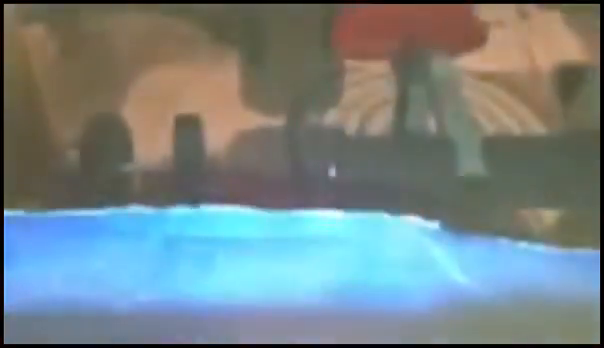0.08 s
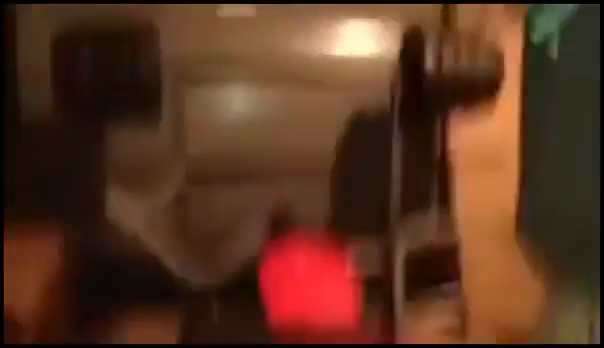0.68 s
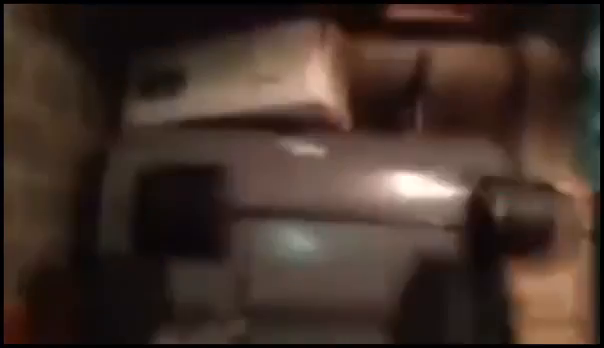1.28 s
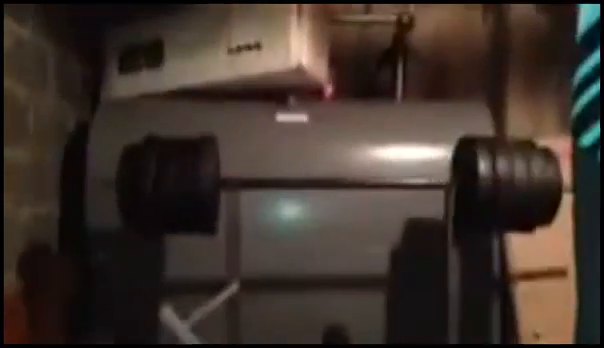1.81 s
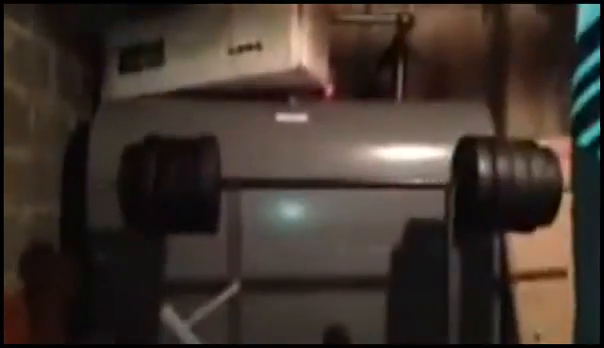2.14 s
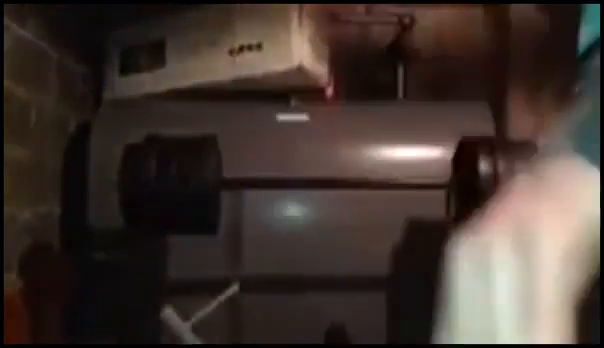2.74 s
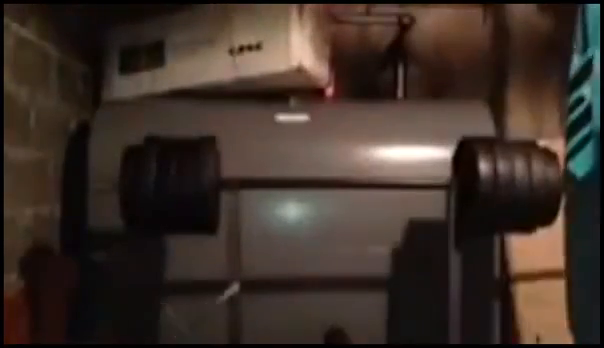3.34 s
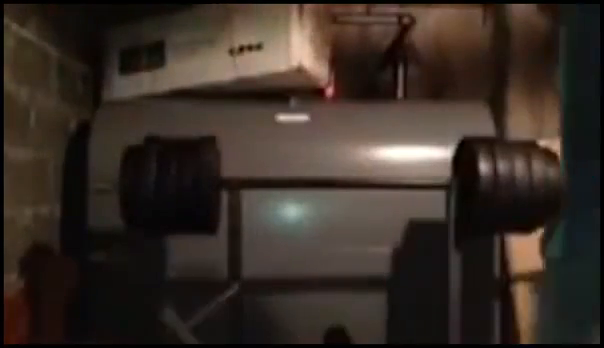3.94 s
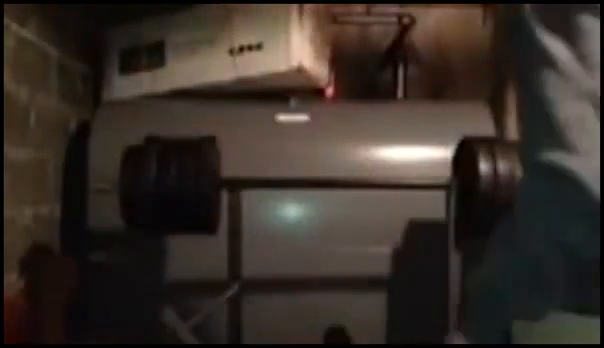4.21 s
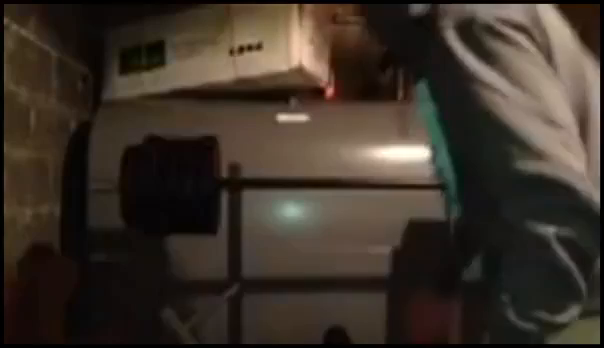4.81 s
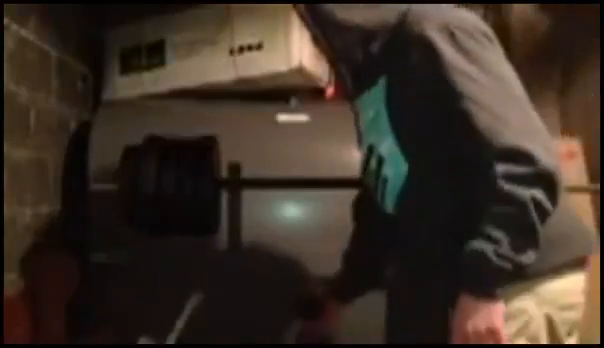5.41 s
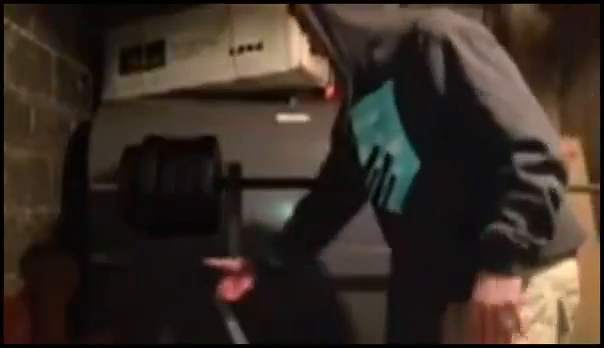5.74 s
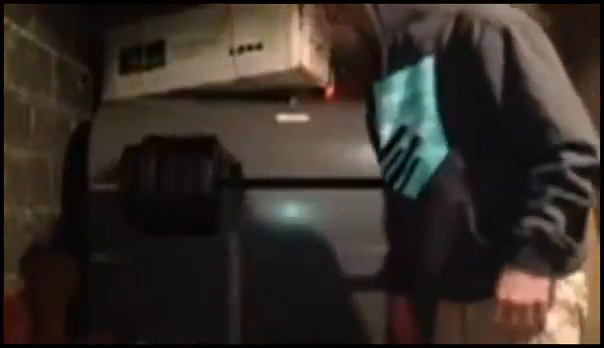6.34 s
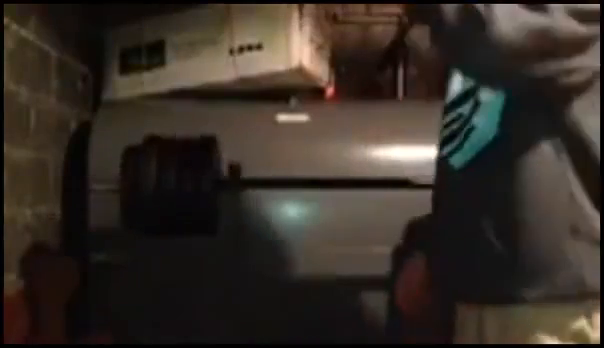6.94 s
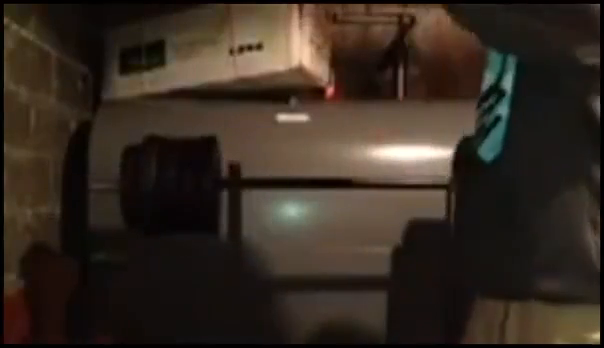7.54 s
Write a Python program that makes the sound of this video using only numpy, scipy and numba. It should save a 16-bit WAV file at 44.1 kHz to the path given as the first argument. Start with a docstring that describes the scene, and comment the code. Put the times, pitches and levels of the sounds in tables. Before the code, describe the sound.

Fingers rub and bump on the microphone, then clothes rustle and a steel weight bench is knocked, ending in two loud, ringing clanks.

```python
"""A small garage gym, heard from a phone's own microphone. For three seconds the phone is carried and
set down: fingers rub, bump and tick on its case, right at the microphone, over dull footfalls.
Then, out in the room, someone walks up to the weight bench with rustling clothes and from 5.5 s
knocks its steel frame a few times. Near 6.5 and 6.8 s a steel part slams home and rings on;
the phone's limiter flattens the two clanks."""
import sys
import numpy as np
from scipy import signal
from scipy.fft import rfft, irfft, next_fast_len
from scipy.io import wavfile
from scipy.ndimage import uniform_filter1d
from numba import njit

SR = 44100
rng = np.random.default_rng(int(sys.argv[2]) if len(sys.argv) > 2 else 0)


def wav_record(signal):
    """Record a signal, one row per channel, as 16-bit PCM in the file named by sys.argv[1]."""
    frames = np.transpose(np.atleast_2d(signal))
    bounded = np.clip(frames, -1, 1)
    # unit amplitude maps onto the largest positive 16-bit level
    quanta = np.round(bounded * 32767).astype(np.int16)
    wavfile.write(sys.argv[1], SR, quanta)


N = 338247
TIME = np.arange(N) / SR
BAND_HZ = 5900  # upper edge of the phone's band


def undb(db):
    """Decibels to gain."""
    return 10 ** (np.asarray(db) / 20)


def unit(x):
    """Scale to an rms of one."""
    return x / np.sqrt(np.mean(x ** 2))


def fade(t60, size=SR):
    """An exponential decay that loses 60 dB in t60 seconds."""
    return np.exp(-np.log(1000) * TIME[:size] / t60)


def colour(x, points, tilt_db=0, size=4096):
    """Causal filter of unit power with a (Hz, dB) shape, tilted by tilt_db per octave above 600 Hz."""
    hz, db = np.transpose(points)
    octave = np.log2(np.maximum(np.arange(size // 2 + 1) * SR / size, 1))
    shape = np.interp(octave, np.log2(hz), db) + tilt_db * np.maximum(octave - np.log2(600), 0)
    shape -= 60 * np.maximum(octave - np.log2(BAND_HZ), 0)
    cepstrum = irfft(np.log(undb(shape)))
    cepstrum[size // 2:] = 0  # minimum phase keeps attacks sharp
    cepstrum[0] = 0
    response = irfft(np.exp(2 * rfft(cepstrum)))
    return signal.fftconvolve(x, response / np.linalg.norm(response))[:len(x)]


def wander(rate):
    """Smooth random drift with an rms of one, turning about `rate` times a second."""
    hold = int(SR / rate)
    stairs = np.repeat(rng.standard_normal(N // hold + 1), hold)
    return unit(uniform_filter1d(stairs, hold)[:N])


def grains(rate, spread_db):
    """Tiny slips at random moments, a few much stronger than the rest."""
    strength = undb(spread_db * np.minimum(rng.exponential(size=N), 5))
    return unit((rng.random(N) < rate / SR) * strength * rng.standard_normal(N))


def waver(x, depth_db, rate):
    """Let each octave swell and sink on its own, so that the colour keeps shifting."""
    size = next_fast_len(N, real=True)
    spectrum = rfft(x, size)
    hz = np.arange(len(spectrum)) * SR / size
    octave = np.log2(np.clip(hz / 375, 1, 16))
    bands = (irfft(spectrum * np.maximum(1 - np.abs(octave - k), 0), size)[:N] for k in range(5))
    return sum(band * undb(depth_db * wander(rate)) for band in bands)


def add(track, start, sound):
    """Mix a sound into a track, `start` seconds in."""
    i = max(int(start * SR), 0)
    track[i:i + len(sound)] += sound[:N - i]


# how hard the fingers slide on the case until they let go (time [s], level [dB])
FINGER_SLIDE = [(0, -29), (.06, -34), (.18, -36), (.28, -57.5), (.495, -78), (.525, -55), (.67, -30),
                (.745, -41.5), (.80, -27), (.95, -42), (1.06, -32), (1.11, -42.5), (1.41, -57.5),
                (1.51, -37.5), (1.58, -46), (1.67, -37.5), (1.82, -49), (2.26, -59.5), (2.38, -52.5),
                (2.66, -59.5), (2.85, -83.5)]
# spectrum of skin sliding on the case (frequency [Hz], level [dB])
SKIN_SPECTRUM = [(60, -20.5), (150, 3), (400, -2.5), (800, 1.5), (1300, -2.5), (3500, -1.5), (5600, -8.5)]
# spectrum of the plastic's crackles and ticks (frequency [Hz], level [dB])
PLASTIC_SPECTRUM = [(120, -13.5), (750, -2), (1200, -0.5), (1700, 3.5), (2500, -4.5), (3500, 0), (4300, 2),
                    (5200, 1.5), (6500, -10)]
SNAP_TILT_DB = 1.3  # per octave: snaps and crackles are brighter than a plain tick
def rubbing(slide_db=-1, crackle_db=-13, light_touch_db=-59.5, firm_touch_db=-29):
    """At the microphone, skin slides in jerks and catches with a crackle; a light touch is brighter."""
    db = np.interp(TIME, *np.transpose(FINGER_SLIDE), right=-np.inf)
    jerks = grains(rate=6000, spread_db=1.31) * undb(1.7 * wander(90))
    skin = undb(db + slide_db) * waver(jerks, depth_db=2.0, rate=14)
    crackle = undb(db + crackle_db) * grains(rate=150, spread_db=2.5)
    firmness = np.clip((db - light_touch_db) / (firm_touch_db - light_touch_db), 0, 1)
    dull = colour(firmness * skin, SKIN_SPECTRUM, tilt_db=-1.16)
    bright = colour((1 - firmness) * skin, SKIN_SPECTRUM, tilt_db=0.5)
    return dull + bright + colour(crackle, PLASTIC_SPECTRUM, SNAP_TILT_DB)


# fingers knocking on the case (time [s], level [dB], pitch [Hz])
FINGER_KNOCKS = [(0.01, -11, 172), (0.029, -9, 290), (0.042, -6.5, 217), (0.115, -11, 194),
                 (0.632, -18, 228), (0.8, -10.5, 171), (0.835, -5, 172), (1.559, -27.5, 200),
                 (1.606, -4.5, 155), (1.635, -4.5, 240), (1.647, -5.5, 584), (1.666, -15, 256),
                 (1.7516, -14, 221), (1.954, -38, 299), (2.333, -41, 180), (2.69, -46, 150)]
# spectrum of the shuddering case (frequency [Hz], level [dB])
CASE_SPECTRUM = [(50, -27), (100, -15.5), (140, 3), (220, -2.5), (380, 1), (650, -2), (1300, -17)]
def bumps(push_cycles=0.46, shudder_db=-13, shudder_t60=0.1):
    """A finger shoves the case around the microphone: a cycle or two of low swing, then a shudder."""
    out = np.zeros(N)
    for start, db, hz in FINGER_KNOCKS:
        age = hz * TIME[:SR] / push_cycles
        swing = np.sin(2 * np.pi * hz * TIME[:SR]) * age ** 2 * np.exp(-age * np.sqrt(2))
        shudder = colour(rng.standard_normal(SR) * fade(shudder_t60), CASE_SPECTRUM)
        add(out, start, undb(db) * (swing / np.abs(swing).max() + undb(shudder_db) * shudder))
    return out


def case_snaps(firm_db=-22, snap_lag_s=.005, snap_db=-3.5, settle_gap_s=.009, settle_db=-6):
    """Rows of ticks: just after a firm knock the case snaps, then settles in two weaker ticks."""
    rows = []
    for start, db, _ in FINGER_KNOCKS:
        gaps = rng.uniform(.3, 1.7, 2)
        if db > firm_db:
            lags = snap_lag_s + settle_gap_s * np.append(0, np.cumsum(gaps))
            for k, lag in enumerate(lags):
                rows.append((start + lag, db + snap_db + k * settle_db, SNAP_TILT_DB))
    return rows


# lone ticks of the case under the fingers (time [s], level [dB], tilt [dB/octave])
CASE_TICKS = [(.018, -24, -2.5), (.062, -18, 5), (.136, -19.5, 2.5), (.144, -8.5, -2), (.174, -15, 1),
              (.192, -21.5, 0.5), (.2145, -21, -1), (.859, -15.5, 8.5), (.895, -27, 11.5), (1.011, -22, 0),
              (1.055, -20.5, 0), (1.168, -22.5, 0.5), (1.466, -33, -6), (1.672, -12.5, 5.5),
              (1.677, -9.5, 5.5), (1.765, -15, 2), (1.8846, -27.5, -3), (1.988, -34.5, 0.5),
              (2.148, -31.5, -3.5), (2.289, -37.5, -4.5), (2.371, -23.5, 0.5), (2.554, -34.5, 1.5),
              (2.6125, -33.5, -4.5), (2.689, -39.5, 2.5), (2.816, -34, -2), (2.828, -31.5, -0.5),
              (2.871, -41.5, 2), (2.949, -41, -0.5), (4.24, -50, 4.5)]
def ticks(snap_t60=0.011, rattle_db=-24, rattle_t60=.04, gain_db=-1, size=4096):
    """Right at the microphone the plastic snaps and rattles, duller or brighter with each touch."""
    out = np.zeros(N)
    decay = fade(snap_t60, size) + undb(rattle_db) * fade(rattle_t60, size)
    for start, db, tilt_db in [*CASE_TICKS, *case_snaps()]:
        tick = colour(rng.standard_normal(size) * decay, PLASTIC_SPECTRUM, tilt_db)
        add(out, start, undb(db + gain_db) * tick / np.abs(tick).max())
    return out


# dull footfalls (time [s], level [dB], tilt [dB/octave])
FOOTFALLS = [(.145, -22.5, 0.5), (.185, -25.5, 1.5), (.394, -34, -2), (.660, -31.5, -0.5), (1.649, -24, 0),
             (2.62, -49.5, -4.5), (5.484, -40.5, 1.5), (5.528, -41.5, -2.5), (5.818, -46, 4.5)]
# spectrum of the floor underfoot (frequency [Hz], level [dB])
FLOOR_SPECTRUM = [(60, -31.5), (140, -6.5), (215, 7.5), (330, -2.5), (600, -0.5), (1100, -3), (1700, -17),
                  (5000, -34)]
def steps(t60=0.2875):
    """Farther from the microphone, footfalls boom briefly in the garage floor."""
    out = np.zeros(N)
    for start, db, tilt_db in FOOTFALLS:
        thud = rng.standard_normal(SR) * fade(t60)
        add(out, start, undb(db) * colour(thud, FLOOR_SPECTRUM, tilt_db))
    return out


# clothes brushing at each stride or reach (time [s], length [s], level [dB], tilt [dB/octave])
CLOTH_SWISHES = [(3.228, 0.161, -62, 8), (3.884, .12, -52.5, 4), (4.181, 0.183, -62.5, 4),
                 (4.338, 0.1774, -48.5, 1), (4.498, 0.234, -55, 3.5), (4.81, 0.186, -61, 3),
                 (4.915, 0.163, -54.5, -2.5), (5.155, 0.1903, -50.5, -1.5), (5.405, 0.328, -49.5, -3.5),
                 (6.133, 0.322, -49, -2.5), (7.299, .16, -66, -2.5)]
# spectrum of the fabric (frequency [Hz], level [dB])
CLOTH_SPECTRUM = [(70, -28), (300, -10.5), (900, 3.5), (1500, 1.5), (2600, 2.5), (4200, 0), (5800, -12)]
def clothes(attack_s=0.1483, release_s=.085):
    """Faint, out in the room: countless fibres brush past each other as the folds shift."""
    out, t = np.zeros(N), TIME[:SR]
    fibres = waver(grains(rate=14000, spread_db=0.07), depth_db=1.5, rate=28)
    for start, length, db, tilt_db in CLOTH_SWISHES:
        swell = np.minimum(t / attack_s, 1) ** 2 * np.exp(-np.maximum(t - length, 0) / release_s)
        brush = swell * np.roll(fibres, -int(start * SR))[:SR]
        add(out, start, undb(db) * colour(brush, CLOTH_SPECTRUM, tilt_db))
    return out


# blows on the bench's steel (time [s], level [dB], place struck [0-2], ring against crash [dB],
# rise [s], crash tilt [dB/octave], crash t60 [s])
BENCH_BLOWS = [(5.482, -35.5, 0, -11.5, 0.00182, -3.5, 0.174), (5.674, -33.5, 0, -4, 0.00337, -3, 0.213),
               (5.844, -35, 0, -5, 0.0018, -0.5, 0.191), (5.957, -26, 0, 6, 0.00657, -1.5, 0.24),
               (6.034, -24.5, 1, -14, 0.00423, -2, 0.197), (6.549, -4, 1, -2.5, 0.00202, 1.06, 0.307),
               (6.581, -5, 1, 0.5, .001, 0.88, 0.2), (6.599, -6, 1, 0.5, 0.00134, 0.37, 0.244),
               (6.794, -3, 2, 0.5, 0.00275, 1.21, 0.3303), (6.880, -9, 2, -1, 0.0062, -1, 0.178)]
# the steel's modes (frequency [Hz], t60 [s], level struck at place 0 [dB], at 1 [dB], at 2 [dB])
STEEL_MODES = [(558.3, 0.28, -14.5, -14, -13.5), (1114, 0.26, -14.5, -20.5, -30.5),
               (1229.6, .22, -9.5, -24.5, -28.5), (1736.8, 0.31, -5.5, -17, -14),
               (1920, .24, -10.5, -18.5, -16.5), (2130, 2.6, -38, -25.5, -43), (2152, 2.4, -26.5, -34, -38),
               (2218, 1.1, -45, -29.5, -34.5), (2231, 1.1, -38, -15.5, -30.5),
               (2283, 0.71, -21.5, -27, -32), (2365, 0.94, -17.5, -20, -38.5),
               (2508, 0.28, -16.5, -21.5, -25), (2677, 0.46, -22.5, -16.5, -31.5),
               (2776, .2, -11.5, -11.5, -12.5), (3031, 0.46, -18.5, -16, -30), (3285, 0.12, -8, -18, -13),
               (3370, .2, -20, -16.5, -17), (3620, 0.362, -14.5, -23, -9), (3764, 0.18, -10, -23, -18.5),
               (3940, .22, -14.5, -17, -15.5), (4908, 0.21, -21.5, -13.5, -11.5),
               (5498, .16, -25.5, -13, -19.5)]
# spectrum of the steel's crash (frequency [Hz], level [dB])
CRASH_SPECTRUM = [(50, -19.5), (130, -12.5), (280, -7), (480, 1.5), (780, -2), (1050, 2), (1350, -1.5),
                  (1800, 2), (2800, 2.5), (4000, 1), (4700, -2.5), (6000, -8)]
def bench(chatter_db=1.53, choke_t60=0.076, size=2 * SR):
    """Out in the room, struck steel gives a chattering crash and rings until the next blow chokes it."""
    out, t = np.zeros(N), TIME[:size]
    hz, ring_t60, *place_db = np.transpose(STEEL_MODES)
    # the long modes near 2.15 kHz beat against each other as they ring on
    modes = np.sin(2 * np.pi * hz[:, None] * t) * fade(ring_t60[:, None], size)
    gaps = np.diff([blow[0] for blow in BENCH_BLOWS], append=TIME[-1])
    for (start, db, place, ring_db, rise_s, tilt_db, crash_t60), gap in zip(BENCH_BLOWS, gaps):
        chatter = rng.standard_normal(size) * undb(chatter_db * wander(170)[:size])
        crash = colour(chatter * fade(crash_t60, size), CRASH_SPECTRUM, tilt_db)
        choke = np.exp(-np.log(1000) * np.maximum(t - gap, 0) / choke_t60)
        ring = choke * (undb(ring_db + place_db[place]) @ modes)
        onset = 1 - np.exp(-t / rise_s)  # a glancing blow scrapes in over a few milliseconds
        add(out, start, undb(db) * (crash + ring) * onset)
    return out


# spectrum of the garage's reverberation (frequency [Hz], level [dB])
GARAGE_SPECTRUM = [(70, -21), (140, 3), (220, 4.5), (400, -1.5), (1500, -3.5), (6000, -6)]
def garage(x, t60=.27, first_echo_s=0.0028):
    """Diffuse reverberation reaches the microphone from close block walls."""
    tail = rng.standard_normal(SR) * fade(t60) * (TIME[:SR] > first_echo_s)
    return colour(signal.fftconvolve(x, tail / np.linalg.norm(tail))[:N], GARAGE_SPECTRUM)


# spectrum of the noise floor (frequency [Hz], level [dB])
HISS_SPECTRUM = [(60, -16), (140, -1.5), (400, -3.5), (1500, -9), (5800, -13.5)]
def hiss(level_db=-67):
    """A faint, steady hiss lies under everything."""
    return undb(level_db) * colour(rng.standard_normal(N), HISS_SPECTRUM)


def scene():
    """One channel: handling is right at the microphone; the bench and the person stand in the room."""
    handling = bumps() + ticks() + rubbing()
    gym = bench() + steps() + clothes()
    to_walls = undb(-17.5) * handling + undb(-17.0) * gym
    return (handling + gym + hiss() + garage(to_walls))[None]


@njit
def follow(x, attack_s, release_s):
    """The limiter's envelope rises fast and falls slowly."""
    attack, release = 1 - np.exp(-1 / (attack_s * SR)), 1 - np.exp(-1 / (release_s * SR))
    out, level = np.empty(len(x)), 0.
    for i in range(len(x)):
        level += (x[i] - level) * (attack if x[i] > level else release)
        out[i] = level
    return out


def record(dry, low_hz=98, ceiling_db=-1.84, top_hz=10500):
    """The phone: a small microphone without bass, a limiter, a band ending near 6 kHz, rounded peaks."""
    thin = signal.sosfilt(signal.butter(3, low_hz, "high", fs=SR, output="sos"), dry)
    envelope = follow(np.abs(thin[0]), attack_s=0.00029, release_s=0.025)
    ahead = np.roll(envelope, -SR // 1000)  # the limiter looks 1 ms ahead
    limited = thin / np.maximum(ahead / undb(ceiling_db), 1)
    narrow = signal.sosfilt(signal.cheby1(12, .2, BAND_HZ, fs=SR, output="sos"), limited)
    rounded = narrow / (1 + (narrow / .96) ** 6) ** (1 / 6)
    return signal.sosfiltfilt(signal.ellip(8, .05, 50, top_hz, fs=SR, output="sos"), rounded)


dry = scene()
out = record(dry)
wav_record(out)
```